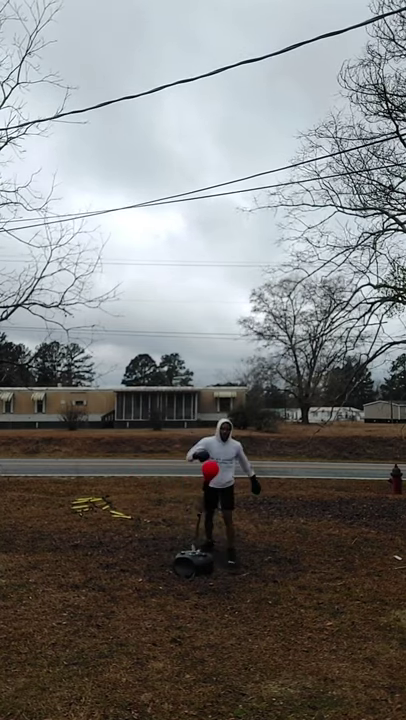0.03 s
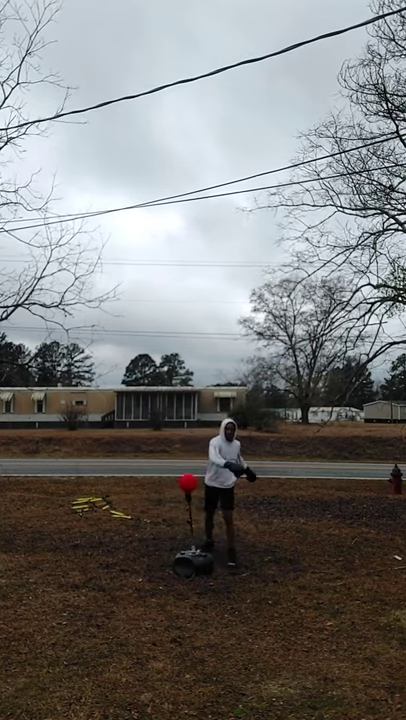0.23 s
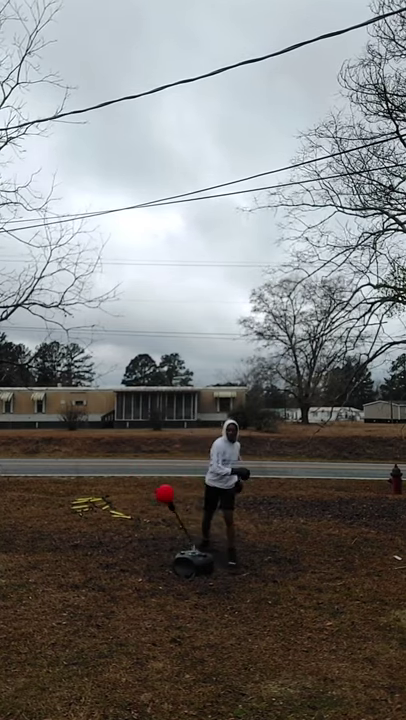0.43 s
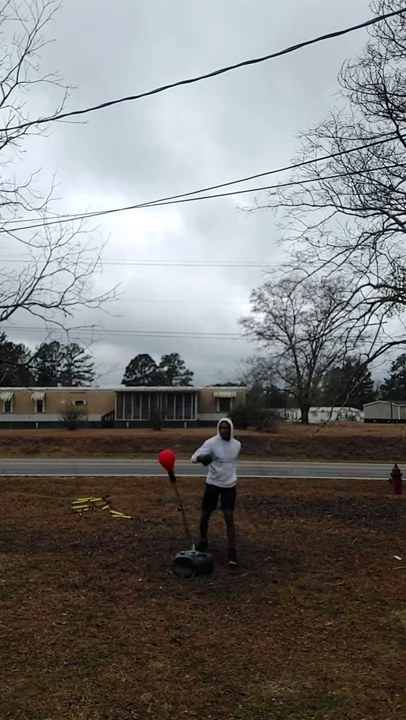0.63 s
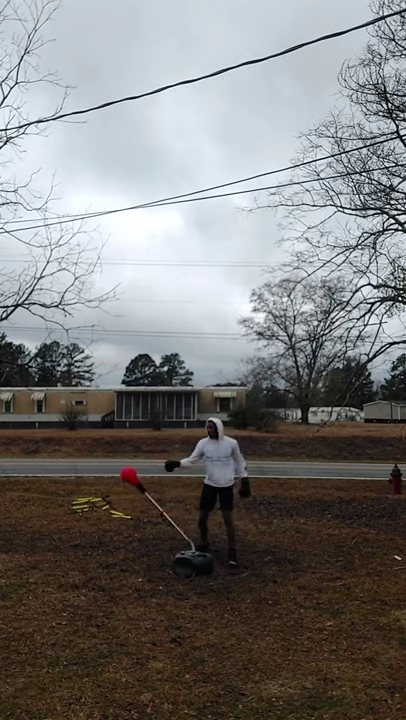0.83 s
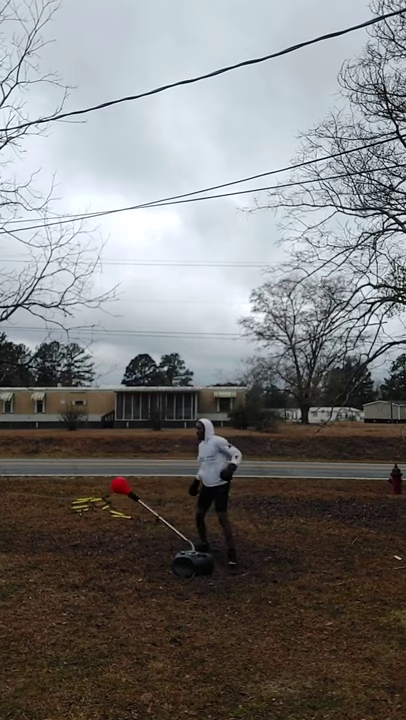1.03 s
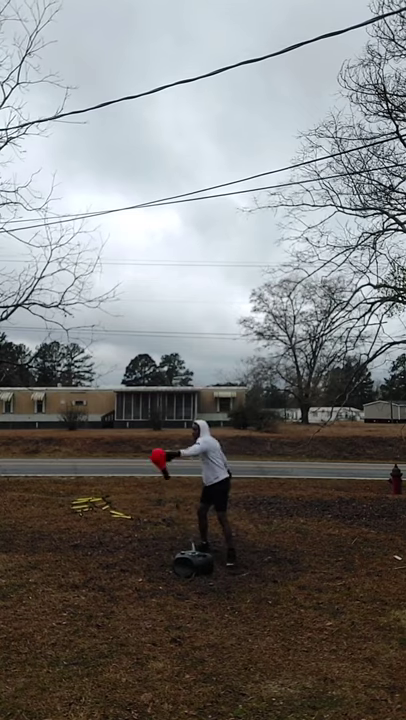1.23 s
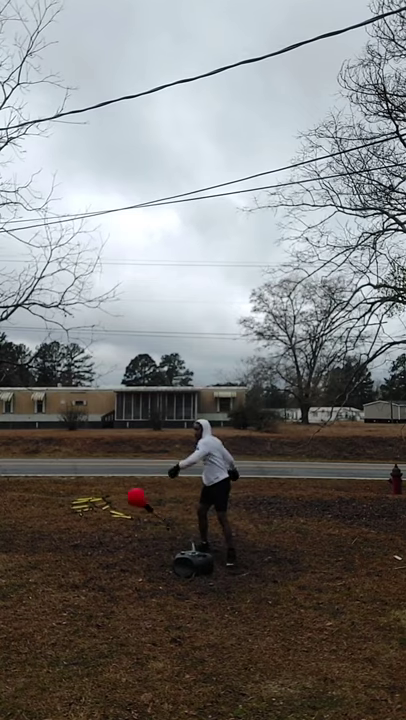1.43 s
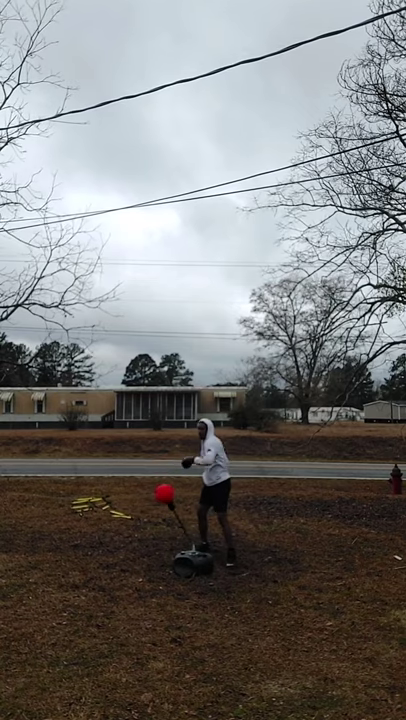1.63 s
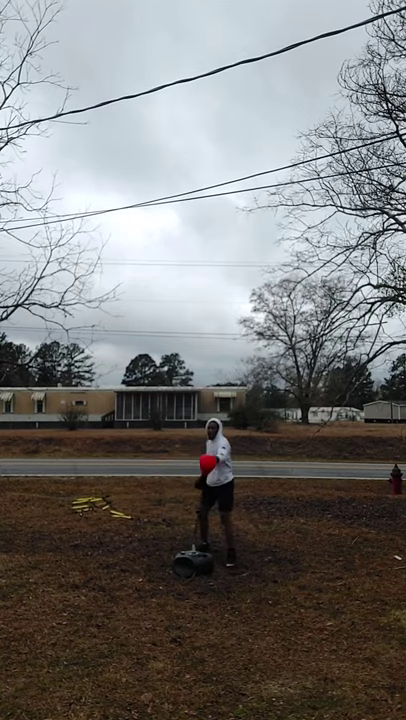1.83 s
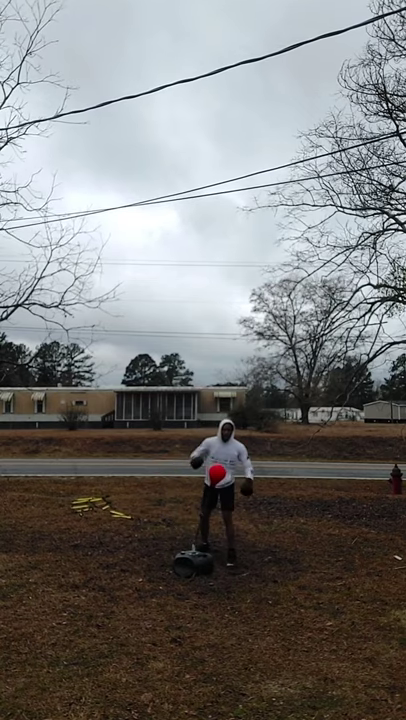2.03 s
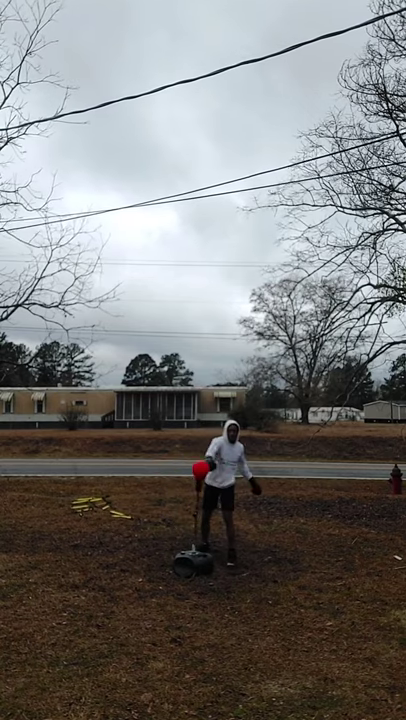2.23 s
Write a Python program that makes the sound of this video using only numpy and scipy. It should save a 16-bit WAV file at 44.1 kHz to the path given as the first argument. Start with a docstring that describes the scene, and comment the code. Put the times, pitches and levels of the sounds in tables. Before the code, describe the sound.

Four gloved punches thump a spring-mounted ball outdoors, its stand rattling and clinking between hits.

```python
"""Four gloved punches hit a reflex ball on a spring stand, some metres away in a grassy yard.
Each is a sharp slap of contact and a short low thump as the ball squashes and springs back.
The pole then knocks in its hollow base, loose parts rattle and the steel spring clinks as it swings.
Houses and trees return a soft echo with a long bass tail, over a low rumble and distant traffic."""
import sys
import numpy as np
from scipy import signal
from scipy.fft import rfft, irfft, next_fast_len
from scipy.io import wavfile

SR = 44100
rng = np.random.default_rng(int(sys.argv[2]) if len(sys.argv) > 2 else 0)


def dump_mix(stems):
    """Bounce the given channels to the path in sys.argv[1] as a 16-bit WAV at rate SR."""
    frames = np.atleast_2d(stems).T  # one column per channel
    limited = np.clip(frames, -1, 1)  # hard clip at full scale
    pcm = np.round(limited * 32767).astype(np.int16)
    wavfile.write(sys.argv[1], SR, pcm)


N = 101429
LEFT_LAG_S, PUNCH_RISE_S, KNOCK_RISE_S = 0.0001, 0.00013, 0.00089

# Each row: start in seconds, slap in dB, contact time in ms, thump in dB, thump pitch in Hz,
# crack in dB, crack tilt in dB per octave, rattle in dB.
PUNCH_HITS = [(0.2211, -4, 0.082, -11.5, 95, -16.5, -0.5, -32),
              (0.8107, -9, 0.036, -15, 93.2, -22, 1, -43.5),
              (1.3494, -7.5, 0.064, -13.5, 100, -21, 1, -33.5),
              (1.923, -8, 0.14, -15.5, 93, -27.5, -2.5, -43)]
def punches():
    """Glove hits ball. Returns the direct sound and, separately, the bass tail."""
    direct, tail = np.zeros((2, 2, N))
    for start, slap_db, contact_ms, thump_db, hz, crack_db, tilt_db, rattle_db in PUNCH_HITS:
        add(direct, start, undb(slap_db) * slap(contact_ms))
        add(direct, start, undb(thump_db) * thump(hz))
        add(direct, start, undb(thump_db - 11) * hollow_pock(PUNCH_RISE_S, t60_s=0.04))
        add(direct, start, undb(crack_db) * crack(tilt_db))
        add(direct, start + 0.015, undb(rattle_db) * rattle())
        add(tail, start + 0.0348, undb(thump_db - 16) * bass_tail())
    return direct, tail


def slap(contact_ms, bounce_s=0.002303):
    """Pressure spike at contact, plus its duller bounce off the lawn."""
    t = np.arange(2048) / SR
    def spike(delay_s):
        u = np.maximum(t - delay_s - np.array([[LEFT_LAG_S], [0]]), 0) * 1000 / contact_ms
        return -u * np.exp(1 - u)
    bounce = undb(-4) * butter(spike(bounce_s), 2200, "low")
    return butter(spike(0) + bounce, 227, "high") * pan(1)


def thump(hz, length_s=0.021, pitch_sag=0.027, left_lead_s=0.00046):
    """The ball squashes and springs back for about two cycles."""
    t = np.arange(4096) / SR + np.array([[left_lead_s], [0]])
    progress = np.clip(t / length_s, 0, 1)
    envelope = np.abs(np.sin(np.pi * progress)) ** 1.25
    phase = 2 * np.pi * hz * t * (1 - pitch_sag * progress / 2)
    return envelope * np.sin(phase) * pan(-5.5)


# Each row: frequency in Hz, relative level in dB.
CRACK_SPECTRUM = [(100, -31.5), (300, 11.5), (850, 4), (1700, -9.5), (2600, 1), (3600, -9.5), (7800, -3.5),
                  (10000, -40), (14000, -28.5)]
def crack(tilt_db):
    """The glove's skin cracks on impact."""
    return burst(CRACK_SPECTRUM, PUNCH_RISE_S, t60_s=0.043, tilt_db=tilt_db)


# Each row: frequency in Hz, relative level in dB.
HOLLOW_SPECTRUM = [(90, -23.5), (190, -1.5), (290, 0.5), (460, 1.5), (620, -11.5), (790, -2), (1020, -27.5),
                   (1300, -7), (2000, -26), (5000, -76)]
def hollow_pock(rise_s, t60_s):
    """A short hollow pock, heard at each punch and each knock of the stand."""
    return burst(HOLLOW_SPECTRUM, rise_s, t60_s)


# Each row: start in seconds, pock in dB, clack in dB, clack tilt in dB per octave.
POLE_KNOCKS = [(0.2378, -28, -21, -3), (0.247, -24, -36, -10), (0.267, -33, -51, -6),
               (0.28, -32.5, -44, 21), (0.2973, -37.5, -27, -12.5), (0.309, -44.5, -38, -16),
               (0.3208, -29.5, -30.5, -6.5), (0.336, -36, -34, -11), (0.455, -51, -42, -7),
               (0.824, -28, -33, 4.5), (0.836, -26, -28.5, -3), (0.858, -32, -41, -4),
               (0.874, -36.5, -36.5, -2), (1.366, -24, -29, -4), (1.378, -23.5, -22.5, -1.5),
               (1.392, -32, -42, -11), (1.414, -28.5, -33, 7), (1.45, -33, -31, -0.5),
               (1.619, -43, -34, -3), (1.949, -33, -41, -9), (1.964, -42.5, -56, 10),
               (1.9909, -30.5, -30.5, -7.5), (2.028, -41, -42, -5)]
# Each row: frequency in Hz, relative level in dB.
CLACK_SPECTRUM = [(200, -24), (700, 8), (1300, 3.5), (1800, -2), (2400, 8.5), (3300, -4), (4700, 4.5),
                  (7800, 1.5), (10000, -23), (14000, -34)]
def pole():
    """The whipping pole knocks in its base: a hollow pock and a hard clack."""
    out = np.zeros((2, N))
    for start, pock_db, clack_db, tilt_db in POLE_KNOCKS:
        add(out, start, undb(pock_db) * hollow_pock(KNOCK_RISE_S, t60_s=0.095))
        clack = burst(CLACK_SPECTRUM, KNOCK_RISE_S, t60_s=0.051, tilt_db=tilt_db)
        add(out, start, undb(clack_db) * clack)
    return out


def rattle(ticks_per_s=250, tick_s=0.0044, size=16384):
    """Loose parts of the jolted stand tick at random and die away."""
    t = np.arange(size) / SR
    ticks = (rng.random(size) < ticks_per_s / SR) * rng.uniform(0.3, 1, size)
    pulses = signal.lfilter([1], [1, -np.exp(-1 / (tick_s * SR))], ticks)
    envelope = pulses / rms(pulses) * decay(t, t60_s=0.34)
    return envelope * (noise(CLACK_SPECTRUM, size) + undb(-1) * noise(HOLLOW_SPECTRUM, size))


# Each row: frequency in Hz, relative level in dB, T60 in seconds.
SPRING_MODES = [(2460, -24, .04), (5650, -11.5, 0.045), (5590, -3.5, 0.034), (6900, -6, 0.032),
                (7620, -4, 0.032), (8000, -6, 0.037), (8600, -11.5, 0.034)]
def spring_ring(t):
    """Stereo impulse response of the steel coil: a sum of decaying modes."""
    return sum(undb(db) * pan(curve(hz, MIC_PAIR, column=2)) * np.sin(2 * np.pi * hz * t) * decay(t, t60)
               for hz, db, t60 in SPRING_MODES)


# Each row: start in seconds, level in dB, noise tilt in dB per octave.
SPRING_CLINKS = [(0.3297, -36.5, 10.5), (0.3586, -39, 8), (0.388, -32, 3.5), (0.4223, -30, 3),
                 (0.479, -31, 0.5), (0.566, -35, 1.5), (0.6498, -35, 5), (0.7022, -37, 3),
                 (0.7286, -39, -2), (0.7483, -41.5, 0.5), (0.7795, -38.5, -4), (0.9341, -52, -1),
                 (0.98, -43, -1), (1.023, -34.5, 5), (1.147, -59, -4), (1.1965, -70, 0), (1.376, -30.5, 1),
                 (1.417, -28, -1), (1.4475, -32, 1), (1.465, -30.5, 5), (1.494, -34.5, 0),
                 (1.533, -29.5, -1), (1.5616, -30, -3), (1.5881, -31, -1.5), (1.6196, -33.5, -0.5),
                 (1.6479, -33.5, -5), (1.6972, -37, -3.5), (1.7535, -43.5, -1), (1.8049, -59, 4),
                 (2.0045, -38, -2.5), (2.0635, -31.5, -2.5)]
# Each row: frequency in Hz, relative level in dB.
CLINK_SPECTRUM = [(500, -5), (1500, -1.5), (2400, -1), (3500, -9.5), (5500, -0.5), (6500, 2.5), (8100, 7.5),
                  (9300, -19.5), (10800, -22.5), (12800, -3), (14300, -23.5), (16000, -45)]
def spring(chatter_s=0.0019, size=8192):
    """Coils chatter together for a few milliseconds and ring."""
    out, t = np.zeros((2, N)), np.arange(size) / SR
    modes = spring_ring(t)
    for start, db, tilt_db in SPRING_CLINKS:
        chatter = rng.standard_normal((2, size)) * np.exp(-t / chatter_s)
        tone = signal.fftconvolve(chatter, modes, axes=1)[:, :size]
        tone = 2 * tone / np.abs(tone).max()
        clink = burst(CLINK_SPECTRUM, rise_s=0.00037, t60_s=0.044, tilt_db=tilt_db)
        add(out, start, undb(db) * (undb(-8.5) * tone + undb(-3.5) * clink))
    return out


# Each row: delay in seconds, gain in dB.
HOUSE_ECHOES = [(.063, -17), (.088, -11), (.113, -16.5), (.124, -15.5), (.164, -25.5), (.197, -18),
                (.243, -25.5)]
def houses(x, cutoff_hz=190):
    """House fronts reflect the bass of each blow several times."""
    out = np.zeros((2, N))
    bass = butter(x.mean(axis=0), cutoff_hz, "low", order=2)
    for delay_s, db in HOUSE_ECHOES:
        add(out, delay_s, undb(db) * bass)
    return out * pan(-2.2)


# Each row: frequency in Hz, relative level in dB.
YARD_SPECTRUM = [(60, -4.5), (160, 3.5), (400, -2), (900, -5), (2500, 2.5), (7500, -3), (11000, -8.5),
                 (15000, 4)]
# Each row: band centre in Hz, T60 in seconds.
YARD_DECAY = [(100, 0.58), (400, 0.45), (1000, 0.33), (3000, 0.56), (7000, 0.44), (14000, 0.32)]
def yard(x, rise_s=0.0069, size=32768):
    """Trees and houses scatter an echo that fades at its own rate in each band."""
    t, hz = np.arange(size) / SR, np.fft.rfftfreq(size, 1 / SR)
    scatter = rfft(noise(YARD_SPECTRUM, size))
    log_centres = np.log([row[0] for row in YARD_DECAY])
    response = np.zeros((2, size))
    for band, (_, t60_s) in zip(np.eye(len(YARD_DECAY)), YARD_DECAY):
        band_gain = np.interp(np.log(hz + 1), log_centres, band)
        response += irfft(scatter * band_gain) * decay(t, t60_s)
    response *= 1 - np.exp(-t / rise_s)
    response /= np.sqrt(np.sum(response ** 2) / 2)
    return undb(-7.5) * signal.fftconvolve(x.mean(axis=0)[None], response, axes=1)[:, :N]


# Each row: frequency in Hz, relative level in dB.
TAIL_SPECTRUM = [(35, -61.5), (65, -18.5), (90, 4), (115, -2.5), (140, -9), (175, -25.5), (400, -59.5)]
def bass_tail():
    """Low echo that lingers after a punch."""
    return burst(TAIL_SPECTRUM, rise_s=0.012, t60_s=0.66, size=32768)


# Each row, both tables: frequency in Hz, relative level in dB.
RUMBLE_SPECTRUM = [(20, -36), (40, -25.5), (60, -8), (74, -13.5), (82, 3.5), (92, -15.5), (115, -12.5),
                   (160, -24.5), (220, -41), (600, -64.5)]
TRAFFIC_SPECTRUM = [(100, -2), (250, -2.5), (500, -1), (760, 1.5), (1200, -4), (1900, -11), (2500, -21),
                    (4200, -29), (7700, -25), (10000, -48), (15000, -61)]
def background():
    """Steady low rumble and distant traffic."""
    return undb(-44.5) * noise(RUMBLE_SPECTRUM, N) + undb(-52.5) * noise(TRAFFIC_SPECTRUM, N)


# Each row: frequency in Hz, left-right correlation from 0 to 1, left minus right in dB.
MIC_PAIR = [(60, 0.53, -9.5), (150, 0.7, 0.5), (360, 0.99, 1), (780, 1, 3), (1450, 0.77, 2), (2310, 0, -.5),
            (4470, .05, -2.5), (7700, 0.2, -4.5), (15000, .05, -8)]
def noise(spectrum, size, tilt_db=0, tilt_from_hz=1360):
    """Unit-RMS noise at two microphones, alike in the bass, unrelated in the treble. Tilt per octave."""
    hz = np.fft.rfftfreq(size, 1 / SR)
    correlation = curve(hz, MIC_PAIR)
    mid, side = np.exp(2j * np.pi * rng.random((2, len(hz))))
    pair = mid * np.sqrt(1 + correlation) + np.array([[1], [-1]]) * side * np.sqrt(1 - correlation)
    pair[0] *= np.exp(-2j * np.pi * hz * LEFT_LAG_S)
    db = curve(hz, spectrum) + tilt_db * np.log2(np.maximum(hz, tilt_from_hz))
    x = irfft(pair * undb(db) * pan(curve(hz, MIC_PAIR, column=2)), size)
    return x / rms(x)


def burst(spectrum, rise_s, t60_s, tilt_db=0, size=8192):
    """Noise with a fast rise and exponential decay."""
    t = np.arange(size) / SR
    envelope = (1 - np.exp(-t / rise_s)) * decay(t, t60_s)
    x = noise(spectrum, size, tilt_db) * envelope
    return x * rms(envelope) / rms(x)


def decay(t, t60_s):
    """Envelope falling 60 dB in t60_s."""
    return np.exp(-np.log(1000) * t / t60_s)


def rms(x):
    """Root mean square."""
    return np.sqrt(np.mean(x ** 2))


def undb(db):
    """Decibels to gain."""
    return 10 ** (np.asarray(db) / 20)


def pan(db):
    """Stereo gains for left minus right in dB."""
    return undb(np.array([[1], [-1]]) * db / 2)


def curve(hz, table, column=1):
    """Table column interpolated over log frequency."""
    table = np.array(table, float)
    return np.interp(np.log(hz + 1), np.log(table[:, 0]), table[:, column])


def butter(x, hz, kind, order=1):
    """Butterworth low- or high-pass."""
    return signal.sosfilt(signal.butter(order, hz, kind, fs=SR, output="sos"), x)


def add(out, start_s, x):
    """Mix x into out at start_s."""
    i = int(round(start_s * SR))
    out[:, i:i + x.shape[-1]] += x[..., :N - i]


def scene():
    """Punches, pole and spring with their echoes, over the background."""
    hits, tail = punches()
    direct = hits + pole() + spring()
    return direct + background() + houses(direct) + yard(direct) + tail


# Each row: frequency in Hz, gain in dB.
MIC_RESPONSE = [(15, -24), (28, -13), (45, 0), (60, 0), (8000, -2), (9000, 0.5), (10000, -9),
                (11000, -15.5), (12500, -7), (14300, 0), (15300, -13)]
def record(dry, cutoff_hz=16000):
    """The microphone sheds deep bass and dips near 11 kHz; a steep low-pass cuts the top."""
    size = next_fast_len(N + 4096)
    gain = undb(curve(np.fft.rfftfreq(size, 1 / SR), MIC_RESPONSE))
    coloured = irfft(rfft(dry, size) * gain, size)[:, :N]
    return signal.sosfilt(signal.ellip(8, 0.2, 70, cutoff_hz, fs=SR, output="sos"), coloured)


dry = scene()
out = record(dry)
dump_mix(out)
```